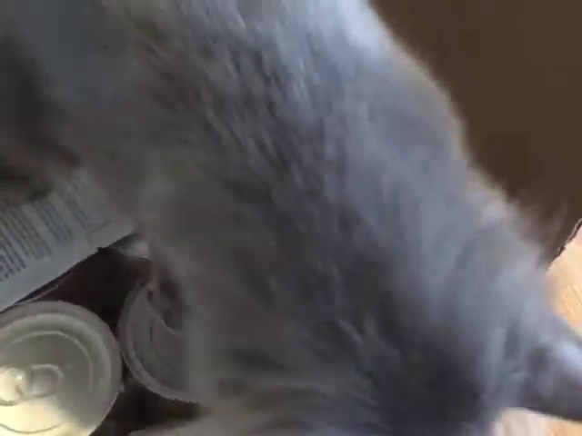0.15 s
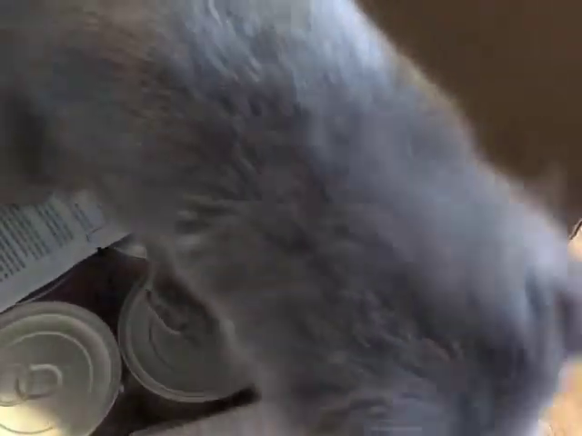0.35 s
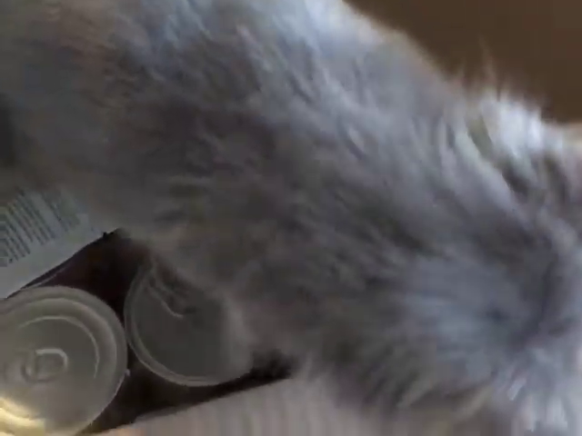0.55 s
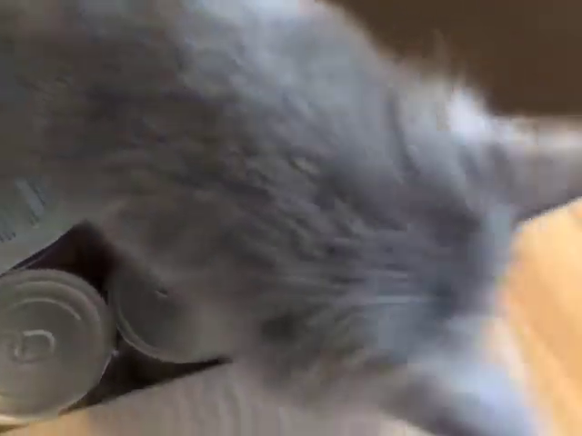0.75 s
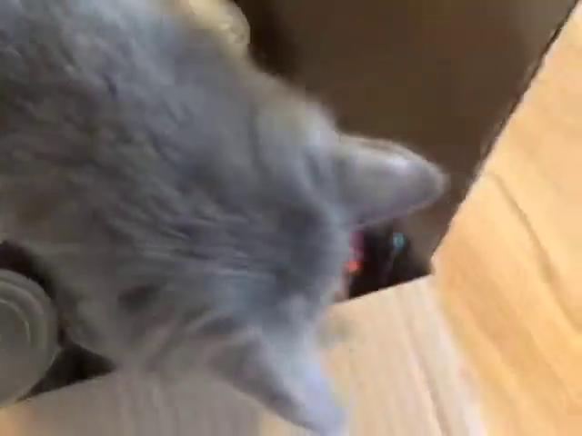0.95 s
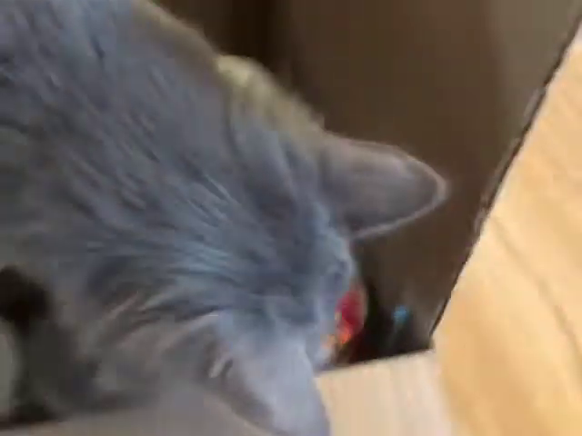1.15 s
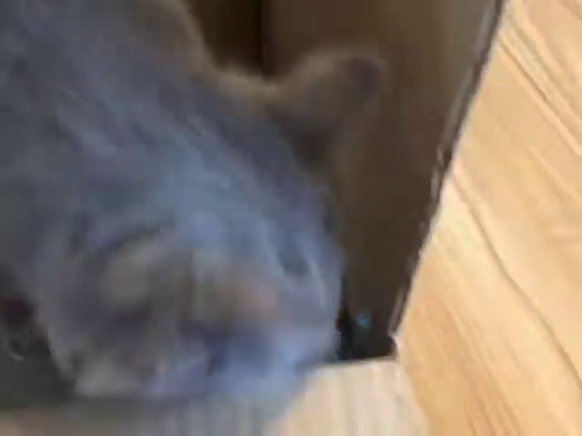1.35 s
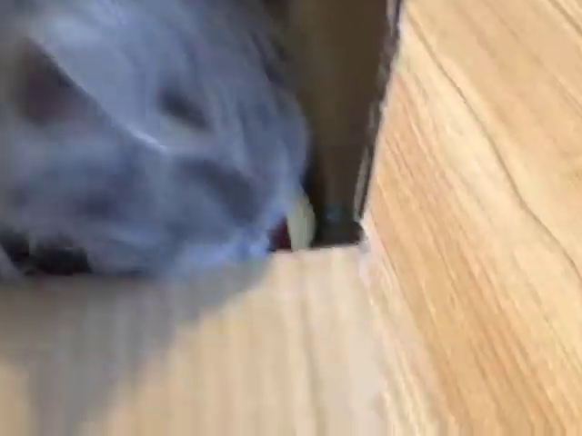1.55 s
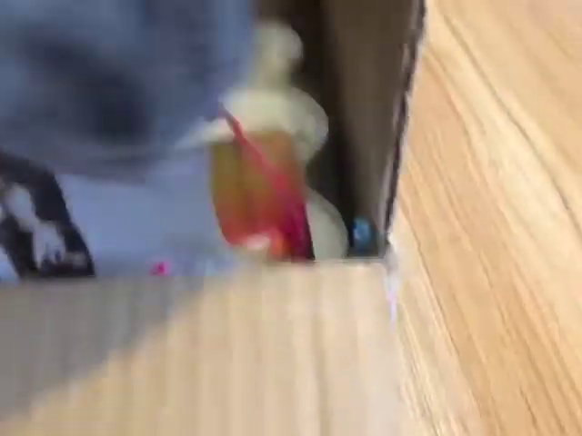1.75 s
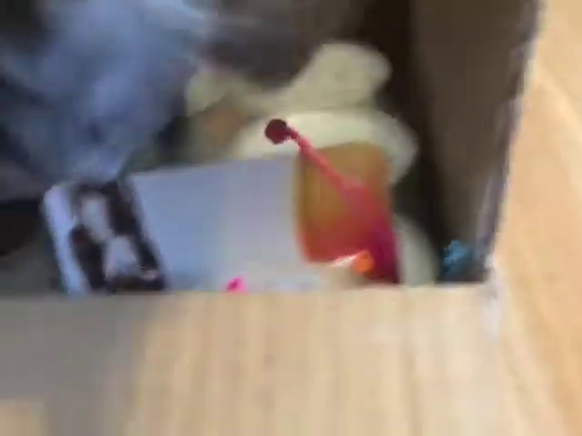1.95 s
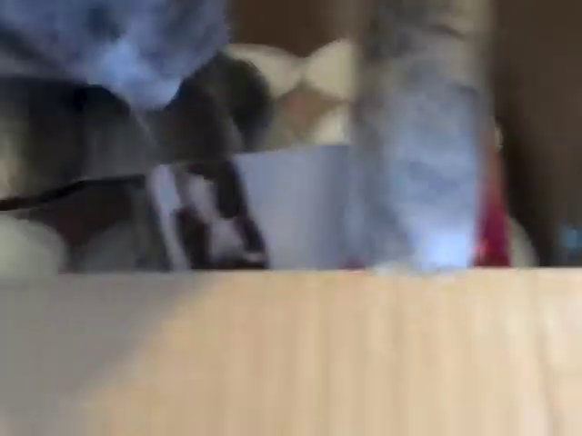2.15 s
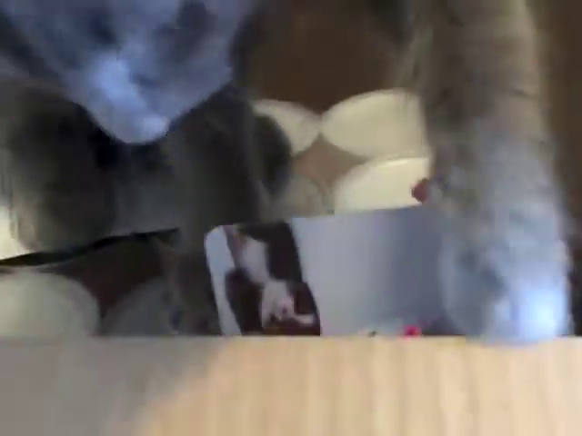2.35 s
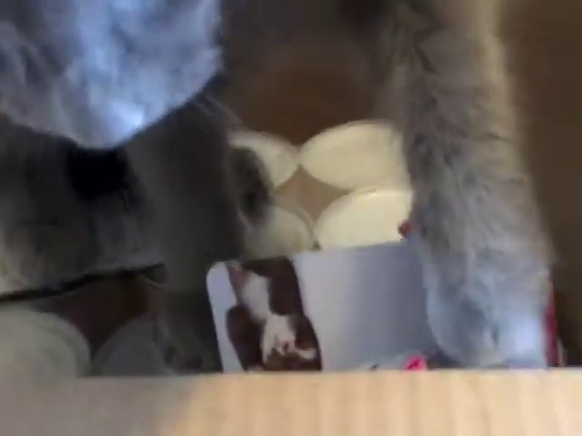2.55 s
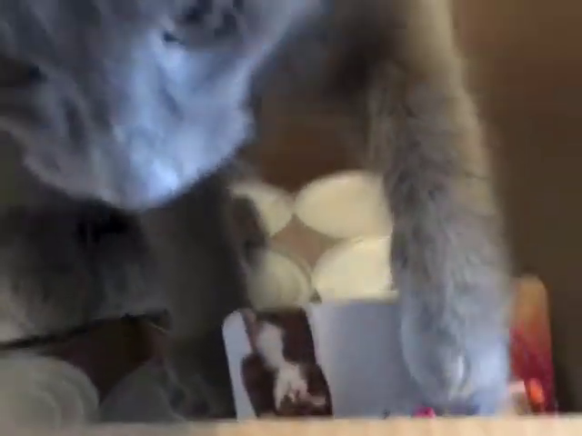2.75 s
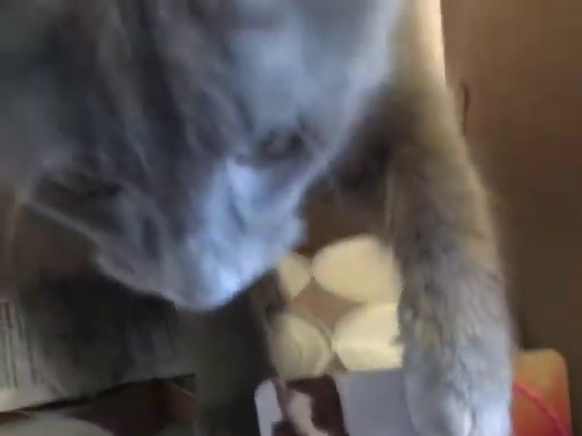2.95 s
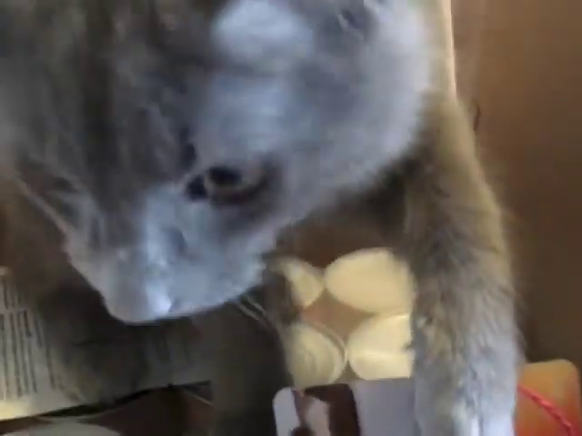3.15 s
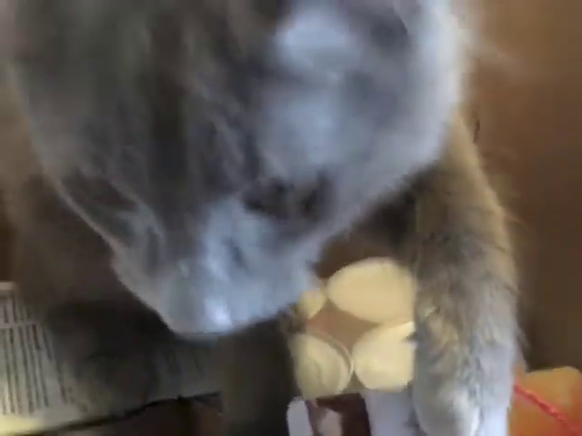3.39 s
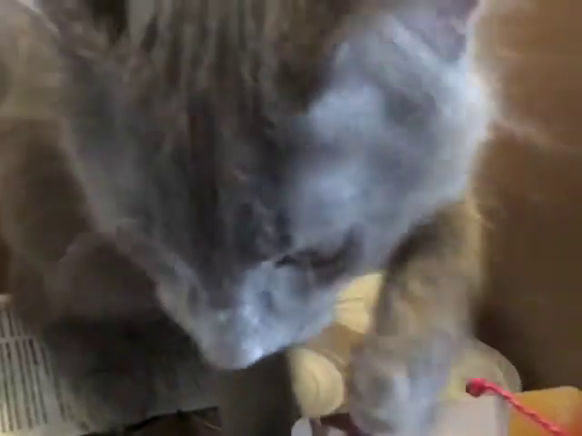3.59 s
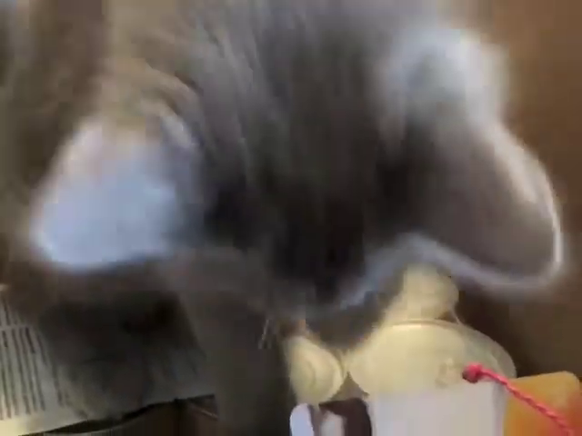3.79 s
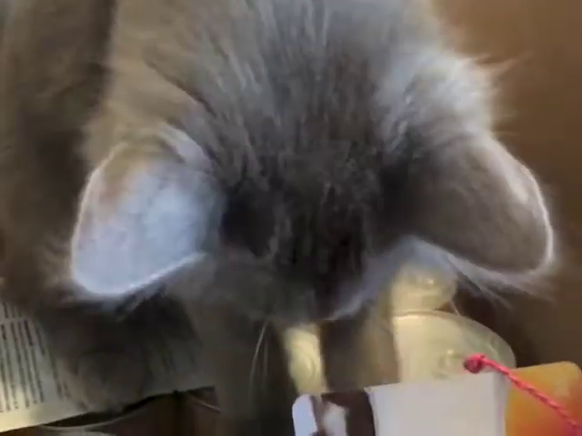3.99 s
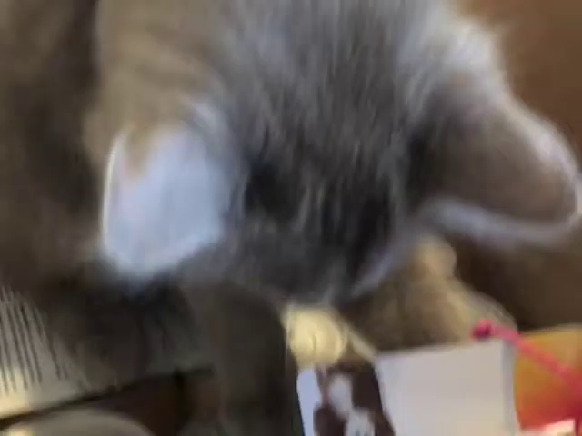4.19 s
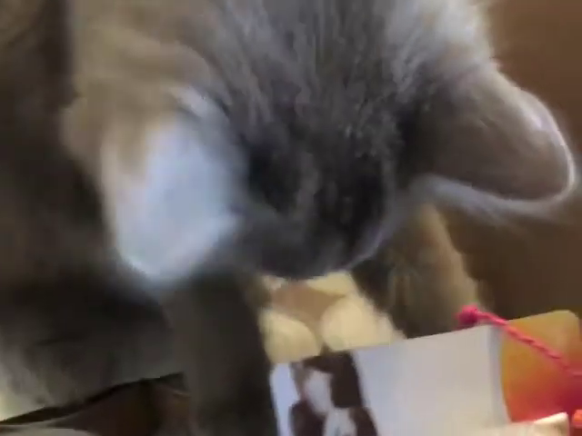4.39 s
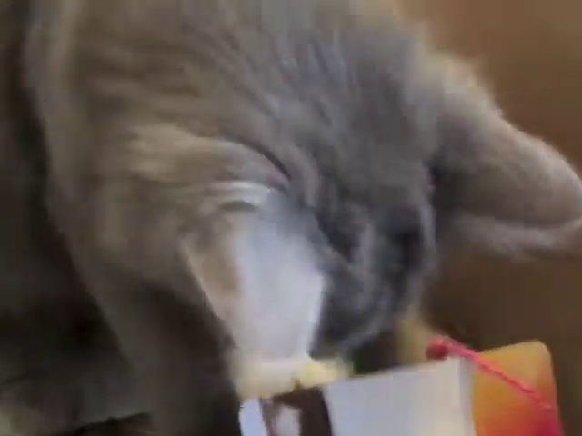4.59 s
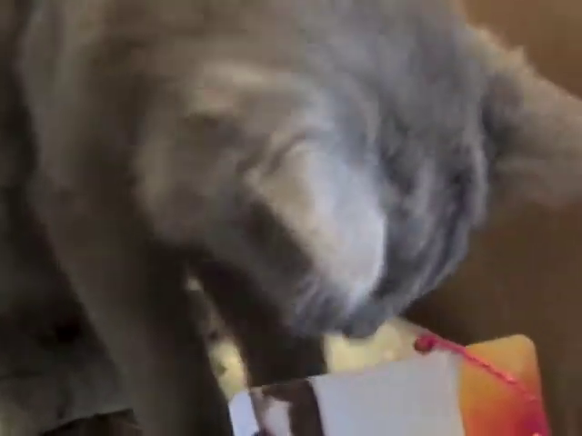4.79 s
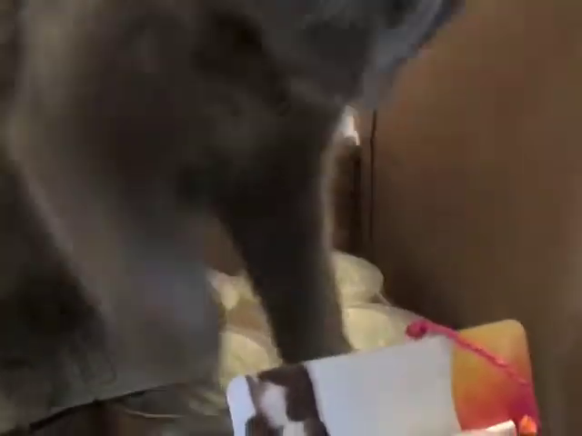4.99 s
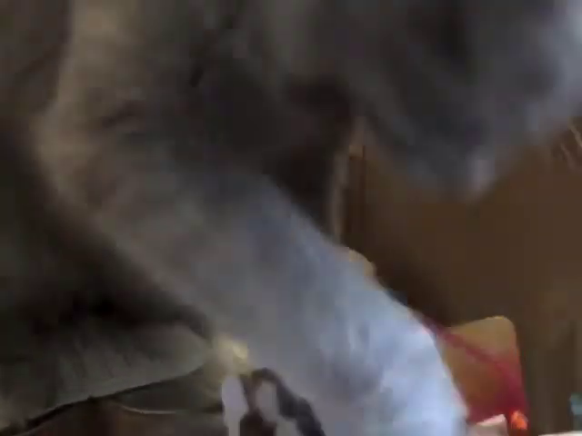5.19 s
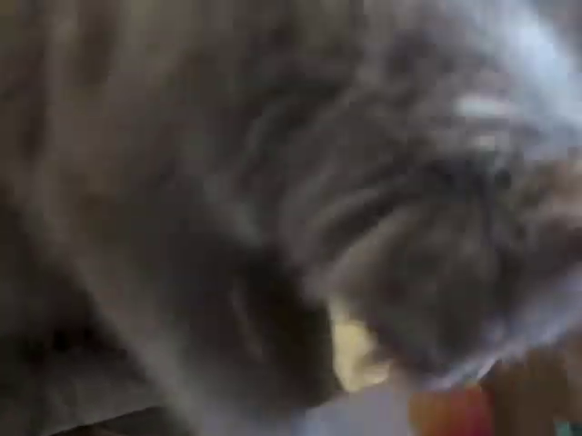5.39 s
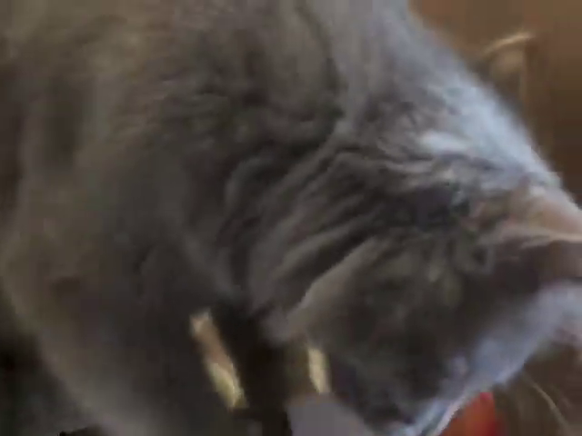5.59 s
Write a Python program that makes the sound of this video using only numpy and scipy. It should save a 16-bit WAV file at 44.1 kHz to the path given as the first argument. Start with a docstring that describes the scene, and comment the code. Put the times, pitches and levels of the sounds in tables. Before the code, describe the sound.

Close microphone at a cardboard box holding cans and packing paper, indoors with a short soft room tail. Claws scratch and tick, paws land with dull hollow thuds, and fur and paper rustle faintly. Activity starts light, turns scrapy near two seconds, nearly rests, then peaks at four and a half with a can's hard clack, ending in scrapes and swelling rustle.

```python
"""A kitten rummages in a cardboard box of cans and packing paper, heard close over a quiet room's mains hum.
First its claws tap and scrape the box; after faint paper rubs and scattered taps, paws thump amid hard scrapes.
A lull of stirring follows, then a busier bout in which a can knocks down hard and the rustle swells to the end.
Claws and paws excite resonances of cardboard and metal; paper and fur are shaped noise and random slips.
Faint taps, paper ticks and a soft room tail fill the gaps."""
import sys
import numpy as np
from scipy import signal
from scipy.fft import rfft, irfft
from scipy.io import wavfile

SR = 44100
rng = np.random.default_rng(int(sys.argv[2]) if len(sys.argv) > 2 else 0)


def transcribe(signal):
    """Save signal, clipped to [-1, 1], as a 16-bit WAV file at the path in sys.argv[1]."""
    frames = np.atleast_2d(signal).T
    limited = np.clip(frames, -1, 1)
    pcm = np.round(limited * 32767).astype(np.int16)
    wavfile.write(sys.argv[1], SR, pcm)


N = 248494
TIME = np.arange(N) / SR
EDGE_HZ = 15900  # upper band limit

# mains hum and its harmonics, before their waver: [f/Hz, rms level/dB]
MAINS_HUM = [(59.6, -50), (120, -54.5), (180.5, -62.5), (239.8, -65), (300, -66), (360, -68)]
# tone of the room's air, relative: [f/Hz, level/dB]
AIR_TONE = [(18, -45), (29, -18), (38, 3), (45, -3.5), (90, 0), (150, -7), (250, -9), (350, -13.5),
            (480, -21.5), (900, -24.5), (2500, -32), (7000, -40.5), (15000, -76)]
# decay of the room tail: [f/Hz, t60/s]
ROOM_DECAY = [(200, 0.59), (1000, 0.28), (4000, 0.37), (9000, 0.28), (14000, 0.091)]
# the kitten's body stirring, before the trims in rustle(): [t/s, paper level/dB, fur hiss level/dB]
BODY_STIR = [(0.0, -47.5, -60.5), (0.63, -60, -63.5), (1.22, -53.5, -59.5), (1.44, -52.5, -66.5),
             (1.73, -56, -65.5), (1.93, -52.5, -60.5), (2.34, -53, -71.5), (2.9, -57, -67),
             (3.48, -65, -67.5), (3.64, -60, -64), (4.42, -54.5, -63.5), (4.67, -56, -61),
             (4.99, -58.5, -65), (5.2, -54, -61.5), (5.36, -45, -62), (5.63, -37, -49.5)]
# soft pushes against the packing paper: [t/s, length/s, paper level/dB, brushing level/dB]
PAPER_RUBS = [(0.529, 0.069, -48.5, -62), (0.905, 0.098, -51.5, -53), (1.554, 0.17, -41.5, -67),
              (1.748, 0.077, -45, -50), (4.053, 0.28, -48.5, -52), (4.692, 0.099, -41, -48),
              (4.909, 0.099, -49, -47.5), (5.22, 0.057, -37.5, -54), (5.497, 0.088, -38, -50)]
# tone of creasing paper, relative: [f/Hz, level/dB]
PAPER_TONE = [(120, -24.5), (250, 4), (460, -1.5), (670, 3), (850, -3.5), (1400, 0.5), (2100, -1.5),
              (2500, -2.5), (3050, -18), (4000, -19), (6000, -31.5), (16000, -33)]
# tone of fur brushing the walls, relative: [f/Hz, level/dB]
BRUSH_TONE = [(1800, -31), (3300, 5), (6000, 4), (7500, 1.5), (9300, 3), (11000, -18), (16000, -22)]
# tone of the fur's hiss, relative: [f/Hz, level/dB]
FUR_TONE = [(1500, -25), (3000, 0.5), (7500, -1.5), (9200, 3), (10500, -3), (13000, 2), (16000, -1.5)]
# paws landing on the box: [t/s, level/dB, wall pitch f/Hz]
PAW_THUMPS = [(1.788, -36.5, 237), (1.904, -34.5, 185), (4.162, -34.5, 306), (4.212, -30, 605),
              (4.2793, -23, 486), (4.384, -37, 270), (4.518, -28, 238), (4.642, -33.5, 286),
              (4.89, -33, 262), (5.157, -28.5, 241), (5.24, -26.5, 284), (5.483, -22.5, 246)]
# modes of the can against the box floor, relative: [f/Hz, level/dB, t60/s]
CAN_MODES = [(227.5, -16, 0.68), (493, -12, 0.11), (711, 1.5, 0.085), (954, -1.5, 0.12), (1010, -32, 0.064),
             (1166, 2, 0.1), (1228, 8.5, 0.092), (1340, 6, 0.083), (1450, -1, 0.048), (1567, 3, 0.094),
             (1700, -16, .08), (1900, -14, 0.089), (2157, -3, 0.07), (2470, 0.5, 0.06)]
# tone of the can's hard crack, relative: [f/Hz, level/dB]
CRACK_TONE = [(180, -40), (300, -22), (950, 2), (1810, 6.5), (2570, -4), (2930, -11), (3950, -0.5),
              (4590, -2.5), (4990, -12), (5800, 3.5), (7570, -14), (8500, -6), (9240, -15.5), (14500, -20),
              (16000, -46)]
# claw strokes: [t/s, time to hardest bite/s, length/s, level before the force curve/dB, fizz re level/dB]
CLAW_SCRAPES = [(.005, 0.0047, 0.056, -28, -13.5), (0.081, 0.02, 0.057, -38.5, -17),
                (1.49, .01, 0.017, -39, -30), (1.783, .002, 0.0094, -38, -1),
                (1.879, 0.012, 0.054, -38, -11), (2.072, 0.009, 0.052, -22.5, -13),
                (2.2545, 0.005, 0.073, -25, -13.5), (2.367, 0.025, 0.099, -28, -13),
                (4.136, 0.0034, 0.024, -39.5, -30), (4.685, 0.04, 0.094, -39, -19),
                (5.144, 0.0022, 0.056, -20.5, -4), (5.289, 0.009, 0.054, -37, -23),
                (5.374, 0.021, 0.04, -30.5, -14.5), (5.464, 0.012, 0.19, -34, -17),
                (5.598, 0.032, .08, -30, -13)]
# resonances of a scraped cardboard panel, before each spot's variation: [f/Hz, width/Hz, level/dB]
PANEL_MODES = [(255, 142, 2), (678, 93, -5.5), (944, 225, 5), (1625, 126, 10), (1927, 165, 10.5),
               (2155, 105, 2.5), (2693, 90, 0.5), (2995, 330, -2), (5460, 700, 1)]
# thin ring of a can lid under a claw, relative: [f/Hz, level/dB]
LID_MODES = [(9950, 3), (11320, 8), (11570, 4), (11860, 0), (12290, -9)]
# tone of the claw's fizz, relative: [f/Hz, level/dB]
FIZZ_TONE = [(2000, -45), (3700, -4), (4700, -3), (5600, -4), (7500, -4.5), (9800, 1), (12500, 0.5),
             (16000, -16)]
# claw taps and small knocks: [t/s, level/dB, pitch of the struck spot f/Hz, snap re level/dB]
CLAW_TAPS = [(.005, -26.5, 2550, -17), (.193, -41, 736, -12), (0.2919, -45, 2280, 6), (.343, -44, 700, -4),
             (.385, -54, 905, 8), (.471, -37, 1040, -27), (0.8084, -43, 1300, -2.5),
             (1.110, -35, 1050, -20), (1.2585, -37, 810, -4.5), (1.312, -29.5, 1000, -7.5),
             (1.330, -40.5, 790, 2.5), (1.3571, -32, 1900, -13), (1.784, -27, 1230, -12),
             (1.8373, -37, 910, -15), (1.975, -36.5, 930, -13), (2.3515, -30, 1950, -14),
             (2.597, -46, 1700, -8.5), (2.809, -45.5, 1300, -23), (4.133, -31.5, 2050, -16),
             (4.159, -43.5, 2400, 8), (4.209, -32.5, 2580, -12), (4.2807, -24.5, 1680, -12.5),
             (4.381, -39.5, 1670, -4.5), (4.5289, -20.5, 1270, -9), (4.6397, -29, 1650, -14),
             (4.654, -24.5, 1800, -21), (4.9728, -36, 800, -6.5), (5.2379, -29, 1520, -9.5),
             (5.284, -29.5, 1940, -20), (5.321, -34, 1710, -20), (5.428, -34.5, 1450, -32),
             (5.445, -31, 1910, -19), (5.5561, -29, 1850, -27)]
# tone of tapped cardboard, relative: [f/Hz, level/dB]
CARDBOARD_TONE = [(100, -42), (260, 11.5), (420, 2), (680, 2), (1100, -3), (1600, -2.5), (2200, -0.5),
                  (3000, -7.5), (5000, -7.5), (16000, -62)]
# tone of a tap's bright snap, relative: [f/Hz, level/dB]
SNAP_TONE = [(1200, -29), (2600, 2.5), (3600, 2.5), (4800, -10), (5900, 1), (7500, -3), (9000, -6.5),
             (12000, -11.5), (16000, -16)]

# whatever is jolted in the box slides on for a moment: time constant, and level against the jolt
SETTLE_S, SETTLE_DB = 0.092, -26
SWELL = 0.63  # share of its length for which a push swells
# faint taps: how many a second, level over the stirring paper, spread either way, pitch range
PATTER_PER_S, PATTER_DB, PATTER_SPREAD_DB, PATTER_LOW_HZ, PATTER_HIGH_HZ = 8, 7.5, 1, 696, 2160
# a wall dies away within WALL_CYCLES swings; a landing at LANDING_DB takes LANDING_S, softer ones longer
WALL_CYCLES, LANDING_S, LANDING_DB = 22, 0.0031, -30
# after its bite a claw lets go, drags on lightly at DRAG_DB against the bite, and lifts off
LET_GO_S, DRAG_DB, LIFT_S = 0.024, -14.5, 0.011
# a spot at RING_HZ tapped at RING_DB has a t60 of RING_S; higher spots and harder taps are shorter
RING_HZ, RING_DB, RING_S = 1000, -35, 0.059
STIFF_POWER, HARD_POWER = 0.92, 0.48


def amp(db):
    """Decibels to gain."""
    return 10 ** (np.asarray(db) / 20)


def unit(x):
    """Scales to rms 1."""
    return x / np.sqrt(np.mean(x ** 2) + 1e-20)


def brief(x):
    """Scales a hit to the energy of 5 ms at rms 1."""
    return x / np.sqrt(np.sum(x ** 2) / (.005 * SR) + 1e-20)


def read(points, hz):
    """Reads a table on a log-frequency axis."""
    f, value = np.transpose(points)
    return np.interp(np.log(hz + 1), np.log(f + 1), value)


def add(mix, s, sound):
    """Mixes a sound in at time s."""
    part = mix[max(round(s * SR), 0):][:len(sound)]
    part += sound[:len(part)]


def colour(x, points, size=4096):
    """Causal, minimum-phase filter with the tabled spectrum."""
    log_gain = np.log(amp(read(points, abs(np.fft.fftfreq(size, 1 / SR)))))
    spectrum = np.exp(np.conj(signal.hilbert(log_gain)))
    impulse = np.fft.ifft(spectrum).real[:size // 2]
    return signal.fftconvolve(x, impulse)[:len(x)]


def resonate(x, hz, width):
    """A resonance with gain 1 at its centre."""
    return signal.lfilter(*signal.iirpeak(hz, hz / np.clip(width, 1, SR / 8), SR), x)


def drift(rate):
    """Slow random curve of rms 1, its spectrum falling off around rate Hz."""
    rolloff = np.exp(-(np.fft.rfftfreq(N, 1 / SR) / rate) ** 2)
    return unit(irfft(rfft(rng.standard_normal(N)) * rolloff, N))


def grains(count, per_s, spread_db):
    """Tiny slips of either sign at random moments, a few much larger than the rest."""
    chance, size, sign = rng.random((3, count))
    strength = amp(-spread_db * np.log(np.maximum(size, np.exp(-4))))
    return np.sign(sign - .5) * (chance < per_s / SR) * strength


def blow(t60, scatter, size=8192):
    """One push, followed by its dying reflections within the box as decaying noise."""
    push = scatter * rng.standard_normal(size) * amp(-60 * np.arange(size) / SR / max(t60, 1e-3))
    push[0] = 1
    return push


def background(air_db=-51, waver_db=0.65):
    """Gently wavering mains hum, and room air whose low rumble swells unevenly."""
    hum = np.zeros(N)
    for hz, db in MAINS_HUM:
        level = amp(db + waver_db * drift(rate=4.1))
        hum += level * np.sqrt(2) * np.sin(2 * np.pi * (hz * TIME + rng.random()))
    air_gain = amp(read(AIR_TONE, np.fft.rfftfreq(N, 1 / SR)))
    air = unit(irfft(rfft(rng.standard_normal(N)) * air_gain, N))
    rumble = signal.sosfiltfilt(signal.butter(2, 150, fs=SR, output="sos"), air)
    swell = amp(3 * drift(rate=9))
    return hum + amp(air_db) * (air - rumble + swell * rumble)


def room(x):
    """A diffuse noise tail that builds up over 12 ms, each band dying at its own speed."""
    hz, t, z = signal.stft(rng.standard_normal(SR), SR, nperseg=256)
    decay = amp(-60 * t / read(ROOM_DECAY, hz)[:, None])
    tail = signal.istft(z * decay * np.minimum(t / .012, 1), SR, nperseg=256)[1]
    return signal.fftconvolve(x, tail / np.linalg.norm(tail))[:N]


def stirring():
    """Level curves in dB of the paper and the fur as the kitten shifts about."""
    s, paper_db, fur_db = np.transpose(BODY_STIR)
    return np.interp(TIME, s, paper_db), np.interp(TIME, s, fur_db)


def crackles(level_db=-57):
    """Now and then a single crease of paper ticks, more strongly while the kitten stirs."""
    paper_db, _ = stirring()
    activity = amp(np.minimum(paper_db - np.median(paper_db), 4))
    ticks = abs(grains(N, per_s=22, spread_db=2.5)) * activity
    burst = signal.lfilter([1], [1, -np.exp(-1 / (.0015 * SR))], ticks)  # each lasts a few ms
    return amp(level_db) * burst * unit(colour(rng.standard_normal(N), FIZZ_TONE))


def rustle(jolts, stir_db=-2.5, hiss_db=3):
    """Packing paper gives in small clumps of creases while fur brushes the walls and jolted things settle."""
    stir, hiss = amp(stirring())
    # paper and brush add up as powers
    paper = (amp(stir_db) * stir) ** 2
    keep = np.exp(-1 / (SETTLE_S * SR))
    brush = signal.lfilter([1 - keep], [1, -keep], (amp(SETTLE_DB) * jolts) ** 2)
    for start, length, paper_db, brush_db in PAPER_RUBS:
        push = np.interp((TIME - start) / length, [0, SWELL, 1], [0, 1, 0])
        paper = paper + (push * amp(paper_db)) ** 2
        brush = brush + (push * amp(brush_db)) ** 2
    creases = grains(N, per_s=3000, spread_db=2.4) * amp(2.6 * drift(rate=50))
    fibres = grains(N, per_s=7000, spread_db=3) * amp(2 * drift(rate=60))
    hairs = rng.standard_normal(N) * amp(1.2 * drift(rate=25))
    creasing = np.sqrt(paper) * unit(colour(creases, PAPER_TONE))
    brushing = np.sqrt(brush) * unit(colour(fibres, BRUSH_TONE))
    return creasing + brushing + amp(hiss_db) * hiss * unit(colour(hairs, FUR_TONE))


def tap(db, hz, bright_db, focus=0.56, broad=0.2):
    """A tap rings one spot of cardboard under a short bright snap."""
    t60 = RING_S * (RING_HZ / hz) ** STIFF_POWER * amp(RING_DB - db) ** HARD_POWER
    body = colour(blow(t60, scatter=0.13), CARDBOARD_TONE)
    spot = resonate(resonate(body, hz, focus * hz), hz, 6.6 * hz)
    body = brief(spot + broad * body)
    snap = brief(colour(blow(.5 * t60, scatter=0.081), SNAP_TONE))
    return amp(db) * (body + amp(bright_db) * snap)


def patter(snap_db=-12):
    """Faint taps at random moments and spots, as strong as the kitten is busy."""
    out, (paper_db, _) = np.zeros(N), stirring()
    for when, strength, spot in rng.random((round(PATTER_PER_S * N / SR), 3)):
        at = int(when * N)
        db = paper_db[at] + PATTER_DB + PATTER_SPREAD_DB * (2 * strength - 1)
        hz = PATTER_LOW_HZ * (PATTER_HIGH_HZ / PATTER_LOW_HZ) ** spot
        add(out, TIME[at], tap(db, hz, snap_db))
    return out


def knock(s=4.5158, crack_db=-11, ring_db=-16, clatter_db=-18, size=12000):
    """A can knocks against the box floor: a hard crack, ringing modes and a short clatter."""
    out, t = np.zeros(N), np.arange(size) / SR
    ring = np.zeros(size)
    for hz, db, t60 in CAN_MODES:
        ring += amp(db - 60 * t / t60) * np.sin(2 * np.pi * (hz * t + rng.random()))
    add(out, s, amp(crack_db) * brief(colour(blow(0.0095, scatter=0.21), CRACK_TONE)))
    add(out, s, amp(ring_db) * brief(ring * np.minimum(t / 0.0026, 1)))
    add(out, s, amp(clatter_db) * brief(colour(blow(0.098, scatter=0.64), PAPER_TONE)))
    # the small box radiates no deep bass
    return signal.sosfilt(signal.butter(4, 200, "high", fs=SR, output="sos"), out)


def thumps(loose=0.69, floor_db=-11, floor_hz=80, size=12000):
    """A soft paw sets the box walls swinging, and its weight presses the floor."""
    out, t = np.zeros(N), np.arange(size) / SR
    for s, db, hz in PAW_THUMPS:
        rise, t60 = LANDING_S * amp(LANDING_DB - db), WALL_CYCLES / hz
        swell = np.minimum(t / rise, 1) * amp(-60 * np.maximum(t - rise, 0) / t60)
        swing = np.sin(2 * np.pi * hz * t)
        walls = resonate(resonate(rng.standard_normal(size), hz, 0.81 * hz), hz, 1.7 * hz)
        weight = amp(floor_db) * np.sin(2 * np.pi * floor_hz * t) * np.exp(-t / 0.025)
        add(out, s, amp(db) * (swell * (swing + loose * unit(walls)) + weight))
    return out


def scrapes(size=12000):
    """A claw bites, then sticks and slips across cardboard and can lids; the slips drive both."""
    out, t = np.zeros(N), np.arange(size) / SR
    for s, rise, length, db, bright_db in CLAW_SCRAPES:
        grip = np.clip((rise + LET_GO_S - t) / LET_GO_S, amp(DRAG_DB), 1)
        lift = np.clip((length - t) / LIFT_S, 0, 1)
        force = np.minimum((t / rise) ** 0.49, grip) * lift
        slips = force * grains(size, per_s=4000, spread_db=2)
        # each spot on the panel favours other resonances
        spot_db = 2.5 * rng.standard_normal(len(PANEL_MODES))
        panel = sum(amp(g + spot) * resonate(slips, f, w) for (f, w, g), spot in zip(PANEL_MODES, spot_db))
        panel = signal.sosfilt(signal.butter(3, 3200, fs=SR, output="sos"), panel)
        lid = sum(amp(g) * resonate(slips, f, 90) for f, g in LID_MODES)
        # the brighter the stroke, the more of it runs over metal
        fizz = unit(colour(slips, FIZZ_TONE)) + amp(bright_db) * unit(lid)
        level = amp(db) * np.sqrt(np.mean(force ** 2))
        add(out, s, level * (unit(panel) + amp(bright_db) * fizz))
    return out


def taps():
    """The distinct taps of the claws, each ringing its own spot of cardboard."""
    out = np.zeros(N)
    for s, db, hz, bright_db in CLAW_TAPS:
        add(out, s, tap(db, hz, bright_db))
    return out


def scene(room_db=-17):
    """Everything the kitten touches, in the humming room."""
    box = taps() + scrapes() + thumps() + knock() + patter()
    muffled = signal.sosfilt(signal.butter(1, 4000, fs=SR, output="sos"), box)  # feeds the room tail
    return (box + amp(room_db) * room(muffled) + rustle(box) + crackles() + background())[None]


def record(dry):
    """Full-scale limit, then a steep low-pass at the band limit."""
    low_pass = signal.firwin(511, EDGE_HZ, window=("kaiser", 9), fs=SR)
    return signal.oaconvolve(np.clip(dry, -1, 1), low_pass[None], "same")


dry = scene()
out = record(dry)
transcribe(out)
```